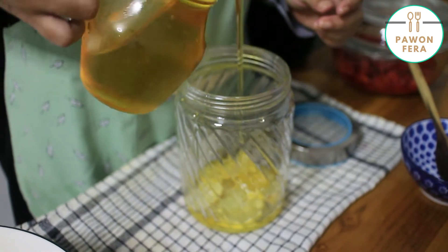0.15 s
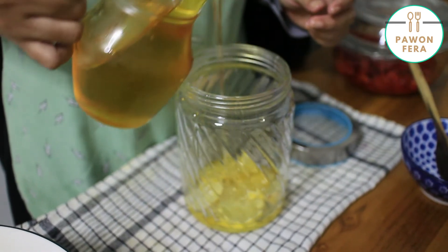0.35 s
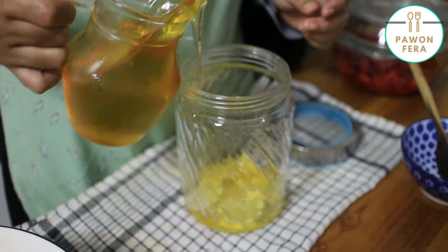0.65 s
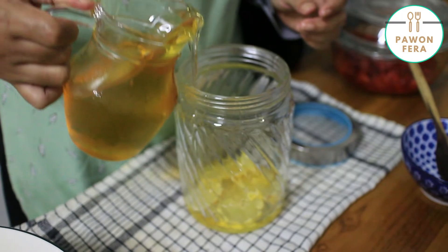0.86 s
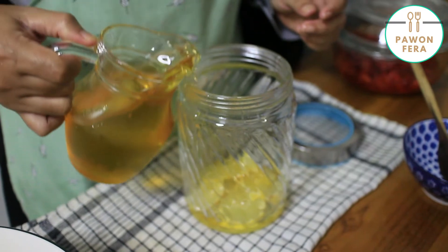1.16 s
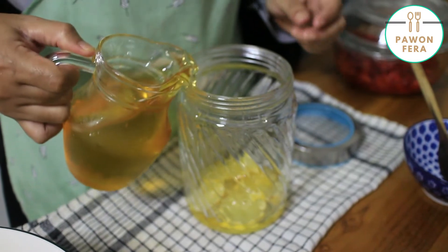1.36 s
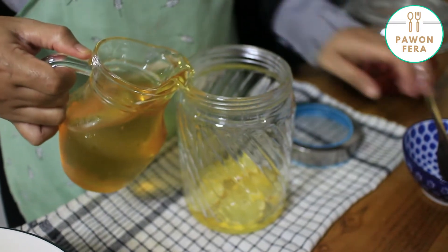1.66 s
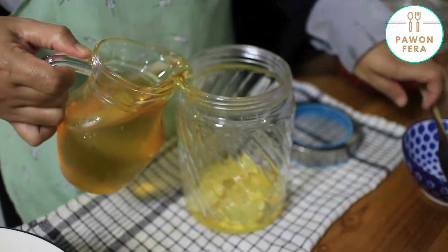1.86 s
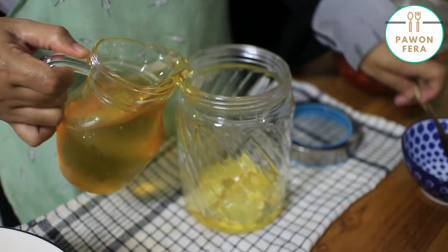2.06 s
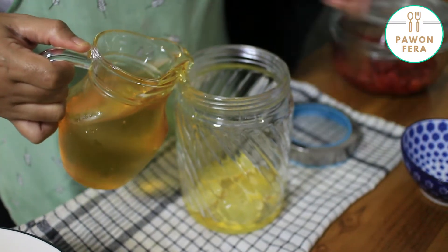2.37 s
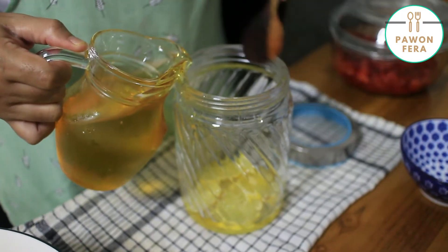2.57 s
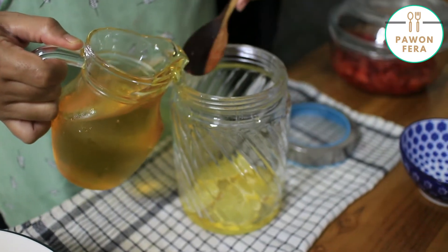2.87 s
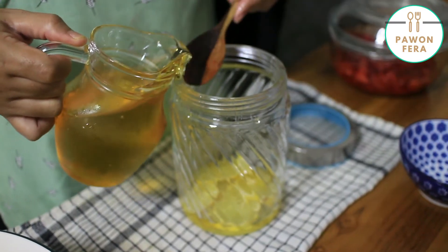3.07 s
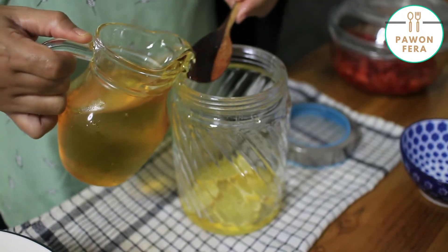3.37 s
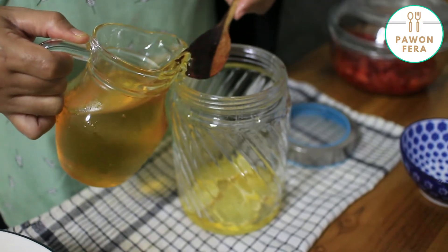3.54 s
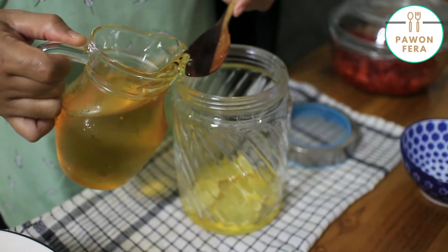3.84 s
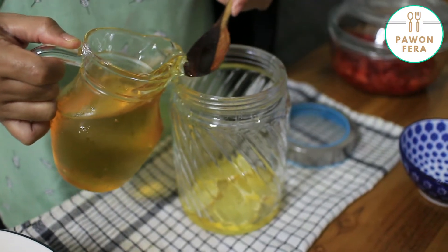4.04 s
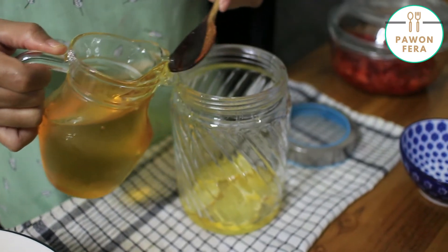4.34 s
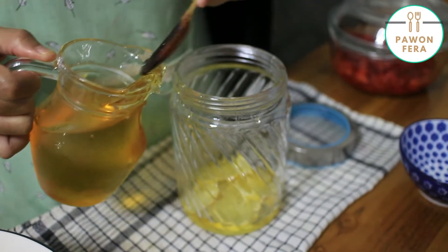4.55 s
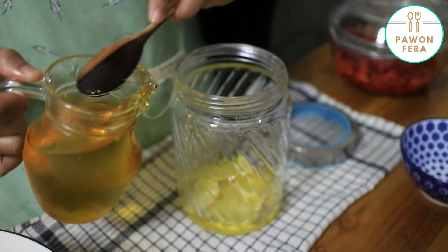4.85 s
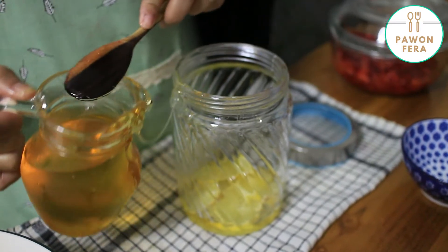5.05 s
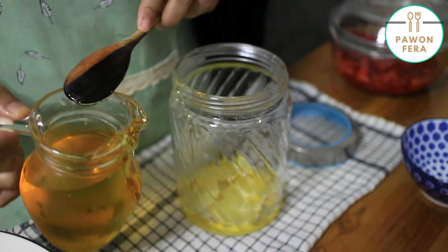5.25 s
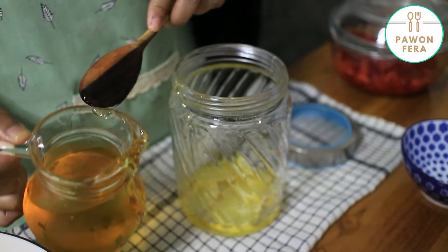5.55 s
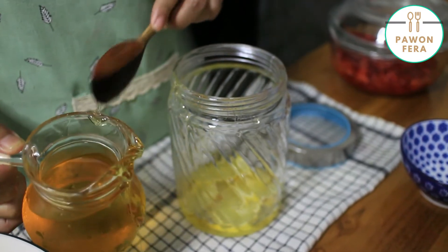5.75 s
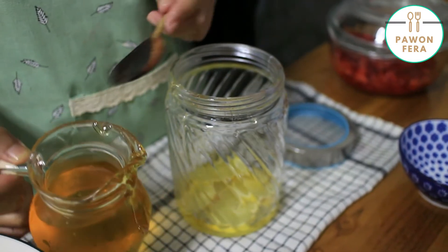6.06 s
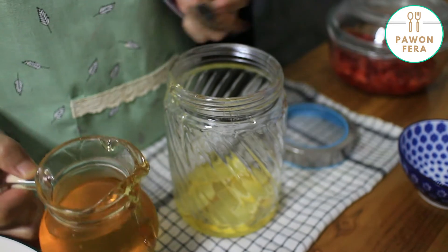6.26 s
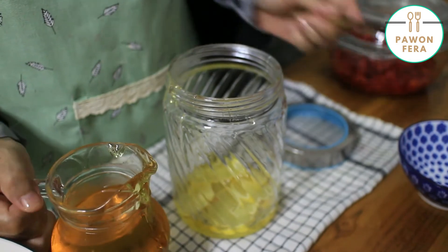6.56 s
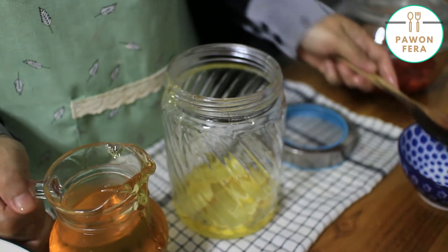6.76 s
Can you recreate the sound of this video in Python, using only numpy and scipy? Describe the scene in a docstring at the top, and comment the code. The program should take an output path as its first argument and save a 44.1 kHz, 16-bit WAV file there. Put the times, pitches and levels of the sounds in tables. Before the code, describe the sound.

A glass jug knocks against a glass jar, a wooden spoon taps, and the jug is set down, over faint kitchen hum and hiss.

```python
"""From the start, a low hum swells and fades over microphone hiss. For three seconds a glass jug knocks
against a glass jar on a cloth-covered kitchen table, which thumps softly once. Two seconds in, a wooden
spoon knocks a china bowl. Near five seconds the spoon taps the jug's spout, and then the jug is set down
with another thump. Each hit is a short clack plus the ringing of the thing hit, echoed by the kitchen."""
import sys
import numpy as np
from scipy import signal
from scipy.fft import rfft, irfft
from scipy.io import wavfile

SR = 44100
rng = np.random.default_rng(int(sys.argv[2]) if len(sys.argv) > 2 else 0)


def to_wav(sig):
    """Store sig (one row per channel, or 1-D mono) as 16-bit WAV at the path in sys.argv[1].

    Samples outside -1..1 are clipped; the rate is SR.
    """
    pcm = np.clip(np.atleast_2d(sig), -1, 1) * 32767
    pcm = np.round(pcm).astype(np.int16)
    wavfile.write(sys.argv[1], SR, pcm.T)  # frames by channels


N = 304730
TIME = np.arange(N) / SR

# the jug knocks the jar: start_s, place on the jar, ring_db, clack_db, extra_bass_db, extra_treble_db
JAR_KNOCKS = [(0.275, "shoulder", 2.5, -4, -2, -2.5), (0.356, "shoulder", -24, -19.5, 12.5, 3),
              (0.4613, "shoulder", -3.5, -8, 11, -2), (0.9367, "neck", -3, 0.5, -1.5, -1),
              (1.251, "shoulder", -11.5, -9, 6, -1), (1.5356, "shoulder", -31, -13.5, 1, -12),
              (2.471, "rim", -4, -4, 0.5, 2.5), (2.8374, "rim", -18, -11, 2.5, -6)]
# the spoon knocks the bowl: start_s, ring_db, clack_db, extra_bass_db, extra_treble_db
BOWL_KNOCKS = [(2.0256, 0, 1.5, 1.5, -2.5)]
# the spoon taps the spout: same columns
SPOUT_TAPS = [(4.8882, 0, 0, 0, 0)]
# the jug lands on one edge, then settles flat: same columns
JUG_LANDINGS = [(5.7198, -0.5, 1.5, -2.5, -3), (5.747, -23, -9, 3.5, -8)]
# the table top thumps under a knock and under the landing jug: start_s, peak_db
THUMPS = [(1.19, -52), (5.712, -51)]

# the tones the jar rings with, by the place hit: pitch_hz, fade_60db_s, shoulder_db, neck_db, rim_db
JAR_TONES = [(54.3, 0.57, -62, -49, -83), (251.3, 0.37, -43.5, -41, -67), (431.5, 0.13, -31.5, -27, -48),
             (555, 0.51, -58, -56, -70), (1771, 0.33, -37.5, -63, -32), (1787, 0.41, -38.5, -28, -35.5),
             (1816.4, 0.14, -20, -18.5, -65), (2018, 0.11, -34.5, -30, -42), (3271, .22, -54, -32, -57),
             (3380, .09, -60, -45, -42), (3620, .1, -66, -58, -44), (4030, .14, -62, -48, -54),
             (4575, .16, -48, -41, -35), (5572, .23, -53, -36, -50), (6080, .09, -66, -59, -47),
             (6848, .18, -68, -63, -41), (7500, 0.061, -62, -60, -39), (7914, .1, -60, -62, -39)]
# the tones the other things ring with: pitch_hz, level_db, fade_60db_s
BOWL_TONES = [(253, -53, .52), (544, -46, .25), (668, -43, .22), (1109, -46, .19), (1572, -45, .6),
              (3009, -37, .6), (4200, -48, .13), (5012, -45.5, .45), (7504, -48, .15)]
SPOON_TONES = [(1260, -47, 0.033)]
JUG_TONES = [(120, -48, .25), (188, -40, .38), (250, -45, .35), (608, -37, .28), (1437, -34.5, .4),
             (2536, -31, .21), (3892, -31, .16), (5443, -44, .23), (7241, -57, .13), (8850, -52, .08),
             (10550, -59, .09)]

# how strong each kind of clack is from bass to treble: pitch_hz, level_db
SHOULDER_CLACK_SHAPE = [(55, -6), (150, -14.5), (400, 3), (800, 0), (1400, -6.5), (2050, 3.5), (2700, -9.5),
                        (4300, -9), (6500, -10.5), (8000, -22), (13000, -37)]
NECK_CLACK_SHAPE = [(55, -4), (150, -10.5), (400, 3), (800, 1.5), (1400, -4.5), (2050, 6), (2700, -9),
                    (4300, -8), (6500, -12), (8000, -22.5), (13000, -34)]
RIM_CLACK_SHAPE = [(100, -33), (420, -1.5), (1200, 2), (2000, 2.5), (2650, -9.5), (3400, 11), (4500, 8.5),
                   (5150, -4.5), (6100, 1.5), (6450, 1), (7150, 9), (8400, -9), (9200, -12), (15000, -29)]
BOWL_CLACK_SHAPE = [(100, -28), (300, -3.5), (550, -2), (1250, 8), (1700, 0), (2300, -16.5), (3400, -4),
                    (4300, -0.5), (5500, -11), (7600, -9), (9500, -22), (14000, -43)]
SPOON_CLACK_SHAPE = [(200, -28), (700, -20), (1000, 2.5), (1250, 4.5), (1600, -4.5), (2300, -10),
                     (4400, -18), (7500, -27), (13000, -39)]
JUG_CLACK_SHAPE = [(50, -16), (170, 6), (330, 0.5), (600, 5), (1000, 4.5), (1300, -9.5), (1600, 5),
                   (2100, -13.5), (2700, 4), (3200, -11), (3900, -9), (4700, -16.5), (8000, -13),
                   (13000, -33)]

# how long the kitchen echoes: pitch_hz, fade_60db_s
ECHO_FADE = [(100, 0.48), (500, 0.37), (2000, 0.34), (8000, 0.35)]
# the slow swells of the hum: time_s, level_db
HUM_SWELLS = [(0.0, -63), (0.2, -59), (0.45, -70), (0.8, -64.5), (1.1, -70), (1.42, -63.0), (1.9, -77.5),
              (2.65, -66.5), (3.82, -77.0), (4.1, -59.5), (4.4, -69.0), (4.75, -68.0), (5.3, -77),
              (6.9, -77.0)]
# the background noise from rumble to hiss: pitch_hz, relative_level_db
NOISE_SHAPE = [(12, -34), (20, -3), (53, -2), (74, -6), (103, -2), (140, -6.5), (185, -10), (298, -9.5),
               (393, -12.5), (705, -13), (767, -13.5), (1300, -15.5), (2150, -17), (2840, -16.5),
               (15500, -18.5)]
# the noise that differs between left and right, against the noise they share: pitch_hz, relative_level_db
NOISE_WIDTH = [(60, -13.5), (110, -12.5), (200, -8), (380, -7), (700, -5.5), (1290, -4.5), (2380, -2.5),
               (4400, -2.5), (8120, -2), (15000, -2)]


def jug_knocks_jar():
    """Knocks on the jar's shoulder and neck are round and full; on the rim they snap hard and bright."""
    knocks = {"shoulder": [], "neck": [], "rim": []}
    for start_s, place, *strengths in JAR_KNOCKS:
        knocks[place].append((start_s, *strengths))
    pitch_hz, fade_s, *levels = np.transpose(JAR_TONES)
    shoulder_tones, neck_tones, rim_tones = [list(zip(pitch_hz, db, fade_s)) for db in levels]
    shoulder = hits(knocks["shoulder"], shoulder_tones, SHOULDER_CLACK_SHAPE,
                    echo_db=-2.5, skid=1.0, skid_s=0.009, swell_s=0.012)
    neck = hits(knocks["neck"], neck_tones, NECK_CLACK_SHAPE,
                echo_db=-0.5, skid=3.4, skid_s=0.0076, swell_s=0.0065)
    rim = hits(knocks["rim"], rim_tones, RIM_CLACK_SHAPE,
               echo_db=-8.5, skid=3.8, skid_s=0.0026, swell_s=0.0038)
    return shoulder + neck + rim


def spoon_knocks_bowl():
    """The wooden spoon catches the china bowl as it is lifted out, and the bowl rings."""
    return hits(BOWL_KNOCKS, BOWL_TONES, BOWL_CLACK_SHAPE,
                echo_db=-5, skid=4.0, skid_s=0.0022, swell_s=0.0022)


def spoon_taps_spout():
    """Wood on the jug's spout gives a dry tap with one tone that dies at once."""
    return hits(SPOUT_TAPS, SPOON_TONES, SPOON_CLACK_SHAPE,
                echo_db=-12, skid=0.11, skid_s=0.0014, swell_s=0.0006, delay_1khz_s=0.0001)


def jug_lands():
    """The glass jug clacks and rings as one edge lands, then more softly as it settles flat."""
    return hits(JUG_LANDINGS, JUG_TONES, JUG_CLACK_SHAPE,
                echo_db=-5.5, skid=1.0, skid_s=0.0037, swell_s=0.019)


def table_thumps(pitch_hz=103.5, rise_s=0.018, hold_s=0.041, fall_s=0.022):
    """Pushed through the cloth, the table top swings a few times with a soft, dull thump."""
    corners_s = np.cumsum([0, rise_s, hold_s, fall_s])
    out = np.zeros(N)
    for start_s, peak_db in THUMPS:
        t = TIME - start_s
        loudness = from_db(peak_db) * np.interp(t, corners_s, [0, 1, 1, 0])
        out += loudness * np.sin(2 * np.pi * pitch_hz * t)
    return out


def hits(rows, tones, clack_shape, echo_db, skid, skid_s, swell_s, delay_1khz_s=0.00121, size=32768):
    """Each hit is a short clack plus ringing tones. Both echo; echo_db sets the clack's echo."""
    out = np.zeros((2, N))
    t = np.arange(size) / SR
    hz = np.fft.rfftfreq(size, 1 / SR)
    # high pitches travel faster through a bending wall, which smears the first spike a little
    smear = np.exp(-4j * np.pi * delay_1khz_s * np.sqrt(1000 * hz))
    for start_s, ring_db, clack_db, bass_db, treble_db in rows:
        click = from_db(clack_db) * sharp_click(at_hz(clack_shape, hz) + tilt_db(hz, bass_db, treble_db))
        # the surfaces skid on each other for a moment after they meet
        burst = rng.standard_normal(size) * np.exp(-t / skid_s)
        scrape = skid * unit_level(burst) / np.sqrt(size)
        clack = irfft(rfft(click) * (smear + rfft(scrape))) / np.hypot(1, skid)
        ring = ringing(t, tones, ring_db, bass_db, treble_db, swell_s)
        into_room = from_db(echo_db) * click + from_db(-18) * ring
        echo = signal.fftconvolve(into_room[None], kitchen_echo(t), axes=1)[:, :size]
        mix_in(out, start_s, clack + ring + echo)
    return out


def ringing(t, tones, ring_db, bass_db, treble_db, swell_s, bite_s=0.0075):
    """A thing that is hit shakes at its own few pitches, and each one fades at its own speed."""
    ring = np.zeros(len(t))
    for pitch_hz, tone_db, fade_s in tones:
        level_db = tone_db + ring_db + tilt_db(pitch_hz, bass_db, treble_db)
        # the ring swells as the first echoes join it, soonest in the high tones
        swell = 1 - np.exp(-t / swell_s * max(1, pitch_hz / 1800))
        # the high tones start loud and lose that bite while the surfaces still touch
        bite = 1.23 * at_hz([(1900, 0.012), (3200, 0.66)], pitch_hz) * np.exp(-t / bite_s)
        fade = from_db(-60 * t / fade_s)
        ring += from_db(level_db) * (swell + bite) * fade * np.sin(2 * np.pi * pitch_hz * t)
    return ring


def tilt_db(hz, bass_db, treble_db):
    """A heavy hit moves the low tones more, a hard hit the high tones."""
    bass = bass_db * at_hz([(420, 0.97), (1300, 0)], hz)
    treble = treble_db * at_hz([(1900, 0), (3200, 0.97)], hz)
    return bass + treble


def sharp_click(level_db):
    """The shortest click that has these levels from bass to treble and is silent before it starts."""
    log_click = irfft(np.log(from_db(level_db)))
    half = len(log_click) // 2
    # the second half stands for time before the start: fold it onto the first half
    log_click[1:half] *= 2
    log_click[half + 1:] = 0
    return irfft(np.exp(rfft(log_click)))


def kitchen_echo(t, build_s=0.0013, width_db=-19):
    """Many reflections build up fast and fade octave by octave, nearly alike on the left and right."""
    noise = rfft(rng.standard_normal((2, len(t))))
    hz = np.fft.rfftfreq(len(t), 1 / SR)
    octaves = np.round(np.log2(np.maximum(hz, 64)))
    echo = np.zeros((2, len(t)))
    for octave in np.unique(octaves):
        band = irfft(noise * (octaves == octave))
        echo += band * from_db(-60 * t / at_hz(ECHO_FADE, 2 ** octave))
    build_up = 1 - np.exp(-t / build_s)
    shared, side = unit_level(echo * build_up) / np.sqrt(len(t))
    return left_right(shared, from_db(width_db) * side)


def low_hum(pitch_hz=98.7, waver_hz=1.39, flutter_db=2):
    """A low tone swells and fades slowly, while its pitch wavers and its level flutters by chance."""
    time_s, swell_db = np.transpose(HUM_SWELLS)
    wavering_hz = pitch_hz + waver_hz * drift(per_s=7)
    phase = 2 * np.pi * np.cumsum(wavering_hz) / SR
    level_db = np.interp(TIME, time_s, swell_db) + flutter_db * drift(per_s=12)
    return from_db(level_db) * np.sqrt(2) * np.sin(phase)


def rumble_and_hiss(shared_db=-59.5, top_hz=15800):
    """The room rumbles in the middle, under a microphone hiss that spreads wider to left and right."""
    hz = np.fft.rfftfreq(N, 1 / SR)
    shape = from_db(at_hz(NOISE_SHAPE, hz)) * (hz < top_hz)
    shared_spectrum, side_spectrum = rfft(rng.standard_normal((2, N))) * shape
    shared = irfft(shared_spectrum, N)
    side = irfft(side_spectrum * from_db(at_hz(NOISE_WIDTH, hz)), N)
    return from_db(shared_db) * left_right(shared, side) / np.std(shared)


def drift(per_s):
    """A new random value per_s times a second, joined by straight lines."""
    return np.interp(TIME * per_s, np.arange(N), rng.standard_normal(N))


def from_db(db):
    """Turns decibels into a number to multiply by."""
    return 10 ** (np.asarray(db) / 20)


def unit_level(sound):
    """Scales a sound so that its average power is one."""
    return sound / np.sqrt(np.mean(sound ** 2) + 1e-20)


def at_hz(points, hz):
    """Reads between the rows of a pitch table, giving every octave the same width."""
    pitch_hz, value = np.transpose(points)
    return np.interp(np.log(np.maximum(hz, 1)), np.log(pitch_hz), value)


def left_right(shared, side):
    """Makes two channels: side is added on the left and taken away on the right."""
    return shared + side * [[1], [-1]]


def mix_in(out, start_s, sound):
    """Adds a sound to out from start_s on."""
    start = round(start_s * SR)
    out[:, start:start + sound.shape[-1]] += sound[..., :N - start]


def scene():
    """All the hits sit straight ahead of the microphone, over the hum and hiss."""
    spoon_and_landing = spoon_knocks_bowl() + spoon_taps_spout() + jug_lands()
    return jug_knocks_jar() + spoon_and_landing + table_thumps() + low_hum() + rumble_and_hiss()


def record(dry):
    """The very highest treble is cut off steeply."""
    treble_cut = signal.firwin(401, cutoff=15800, fs=SR)
    return signal.fftconvolve(dry, treble_cut[None], mode="same", axes=1)


dry = scene()
out = record(dry)
to_wav(out)
```